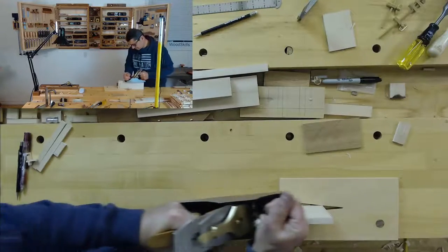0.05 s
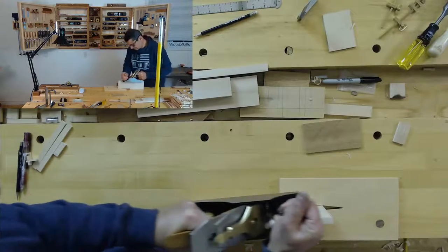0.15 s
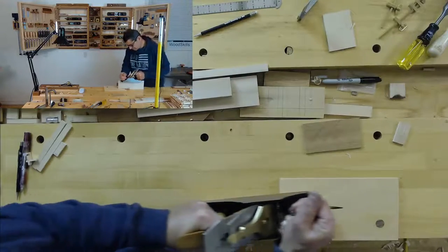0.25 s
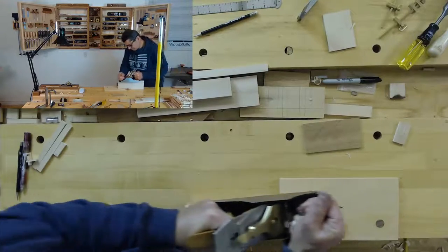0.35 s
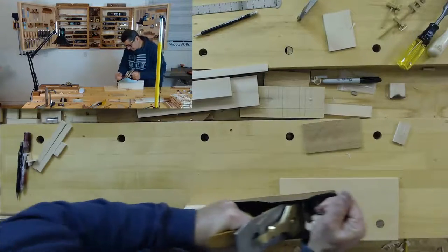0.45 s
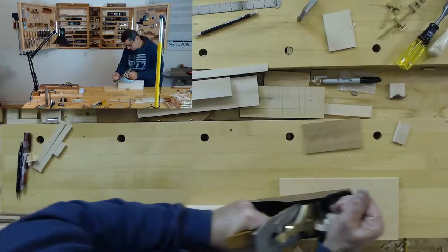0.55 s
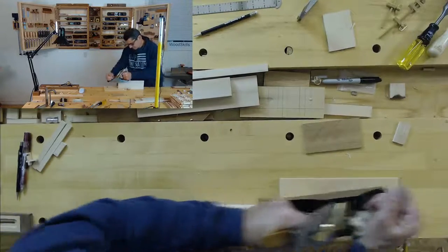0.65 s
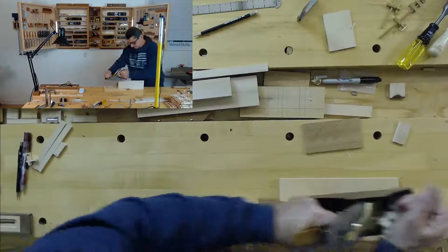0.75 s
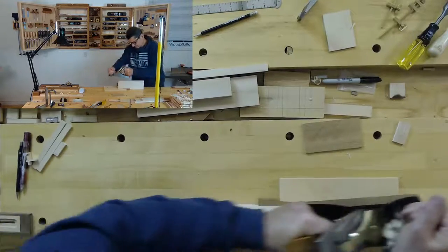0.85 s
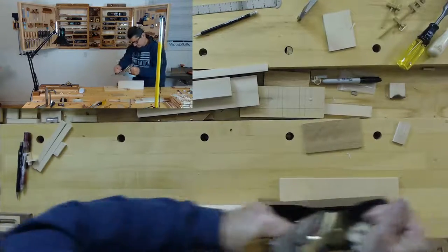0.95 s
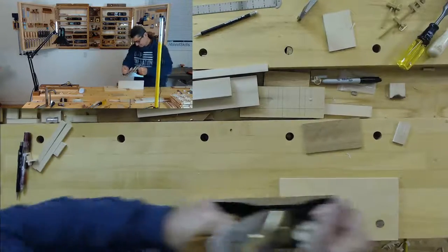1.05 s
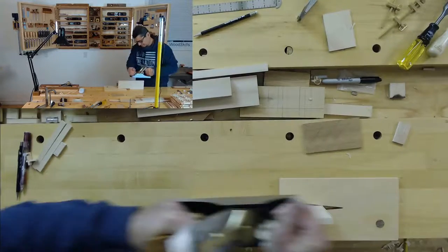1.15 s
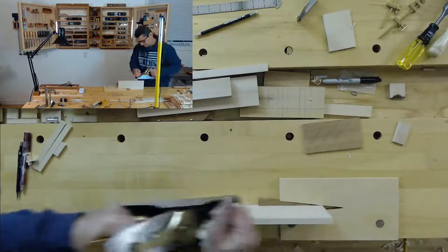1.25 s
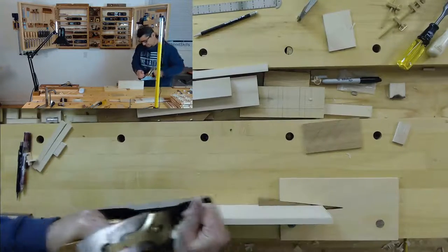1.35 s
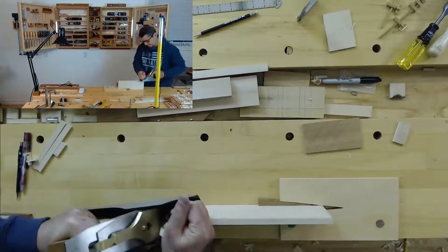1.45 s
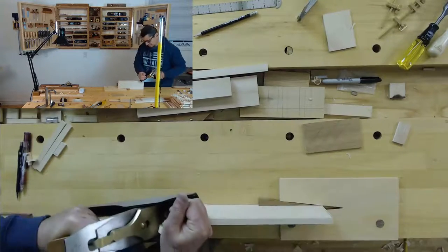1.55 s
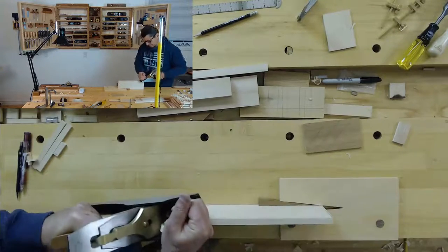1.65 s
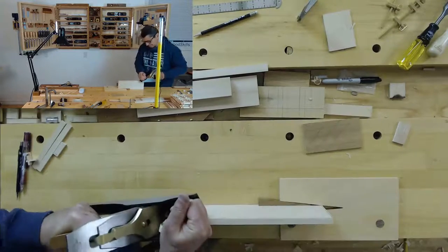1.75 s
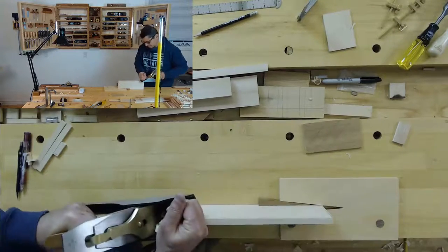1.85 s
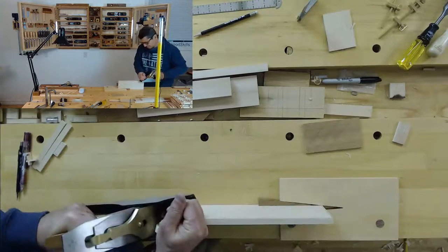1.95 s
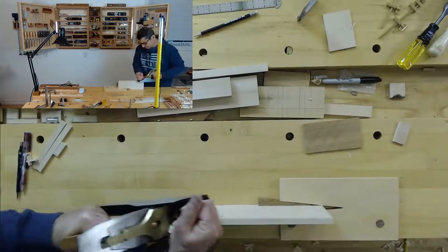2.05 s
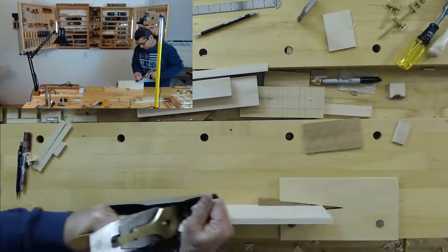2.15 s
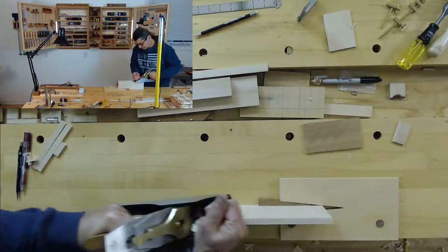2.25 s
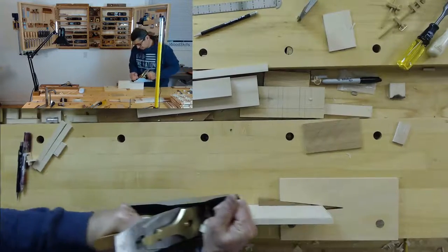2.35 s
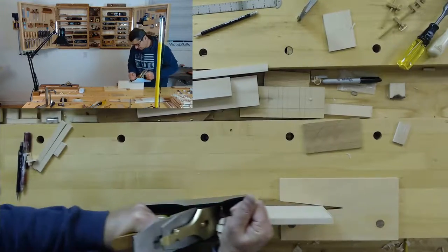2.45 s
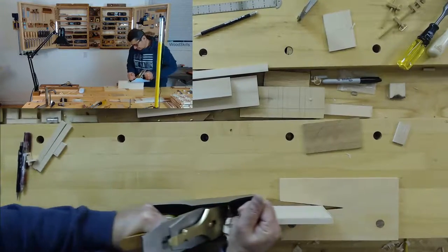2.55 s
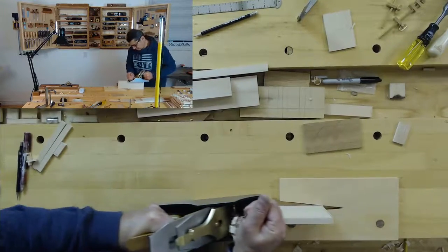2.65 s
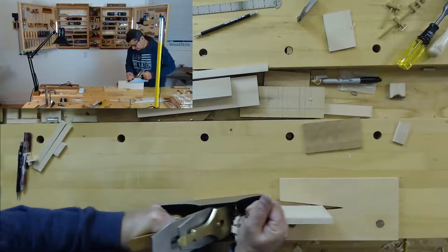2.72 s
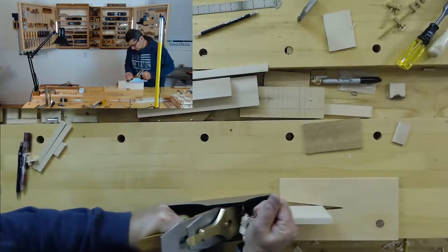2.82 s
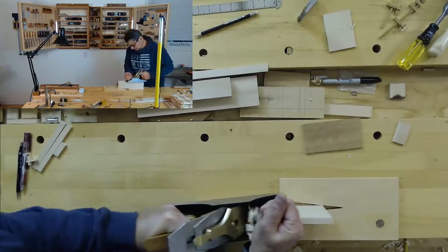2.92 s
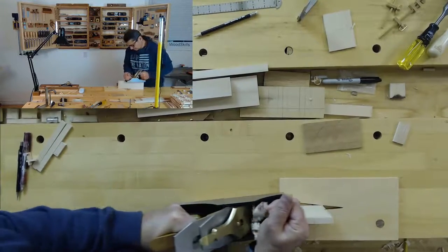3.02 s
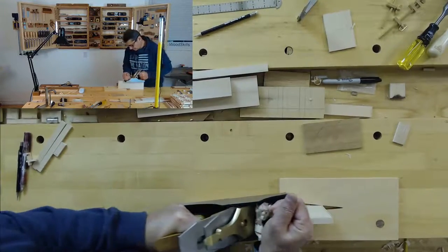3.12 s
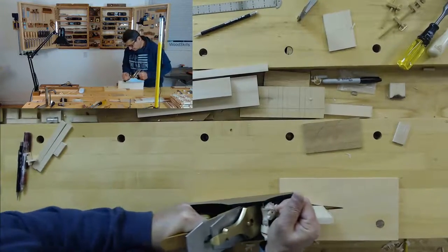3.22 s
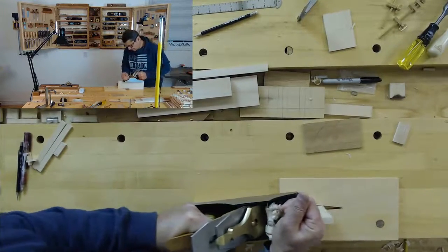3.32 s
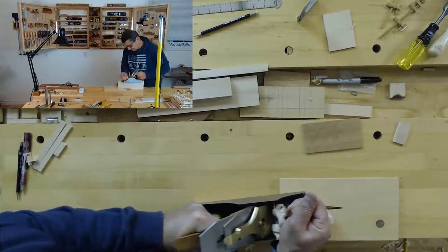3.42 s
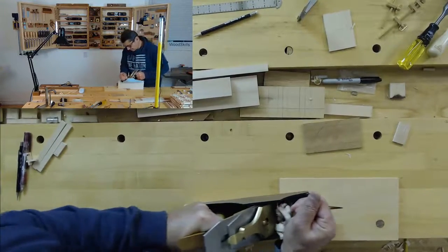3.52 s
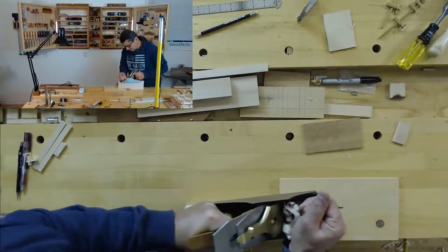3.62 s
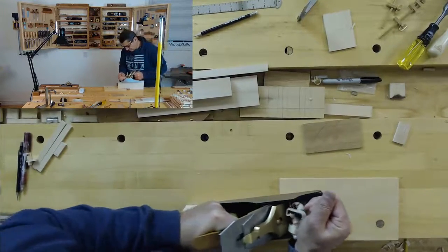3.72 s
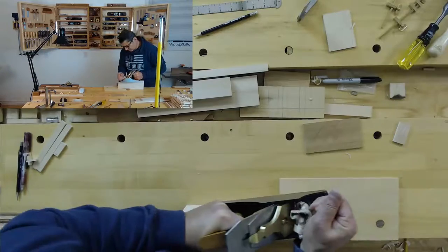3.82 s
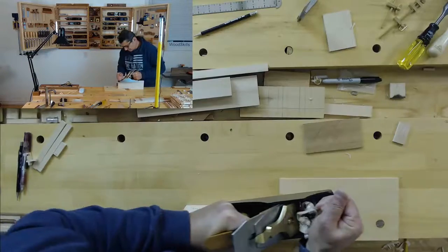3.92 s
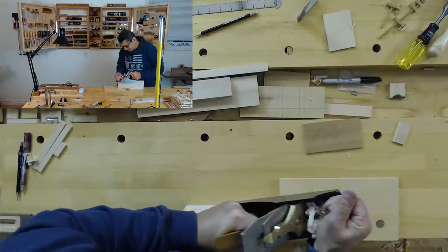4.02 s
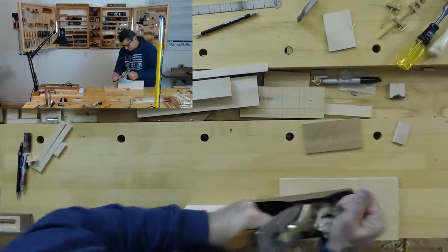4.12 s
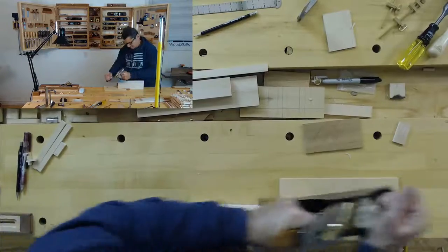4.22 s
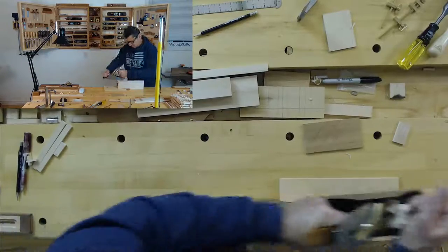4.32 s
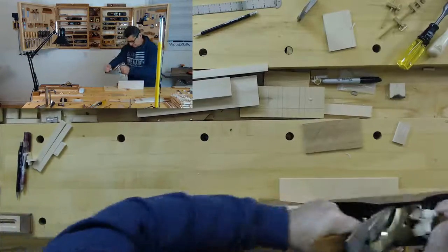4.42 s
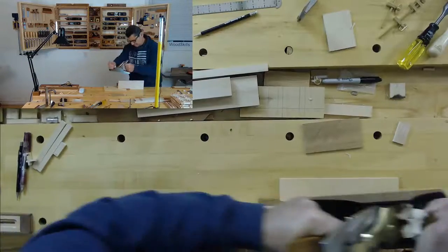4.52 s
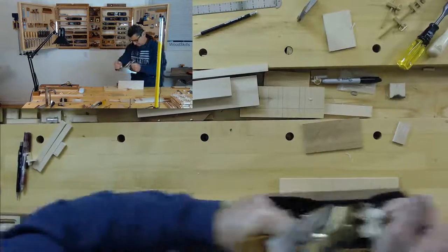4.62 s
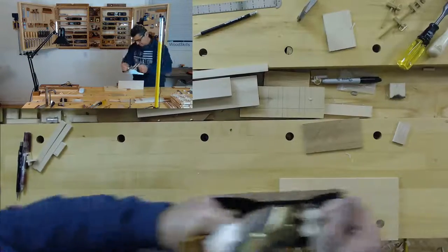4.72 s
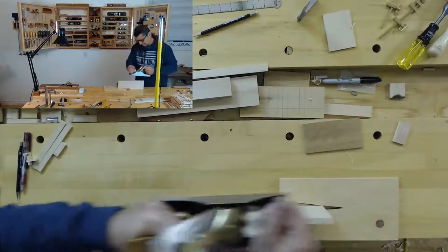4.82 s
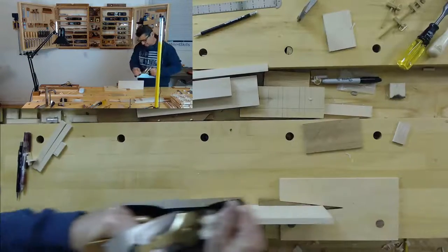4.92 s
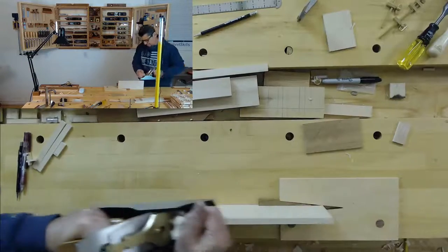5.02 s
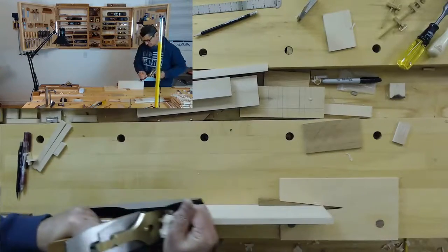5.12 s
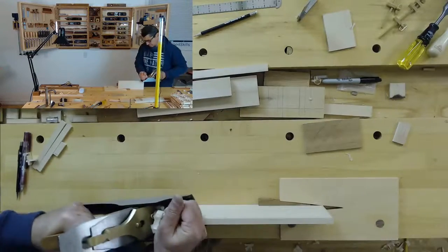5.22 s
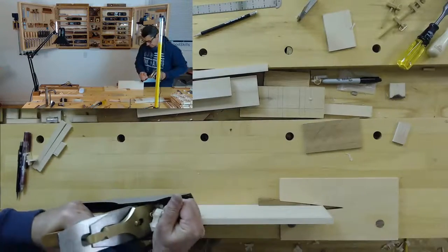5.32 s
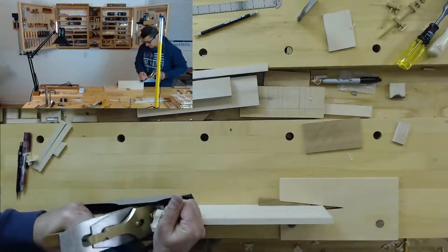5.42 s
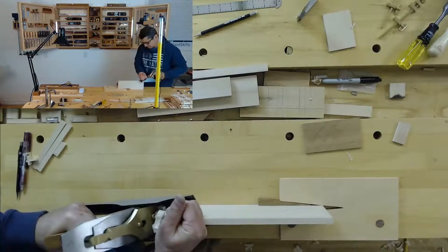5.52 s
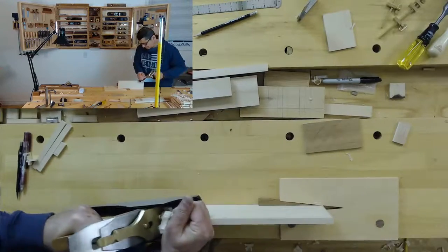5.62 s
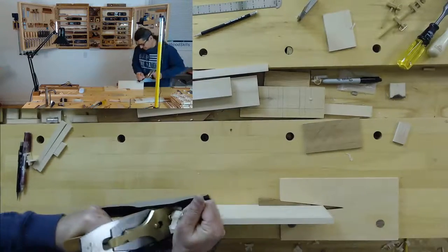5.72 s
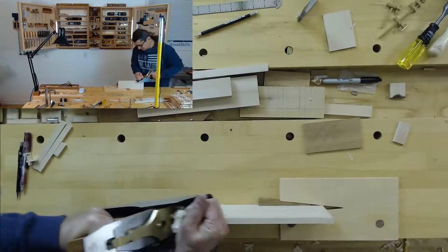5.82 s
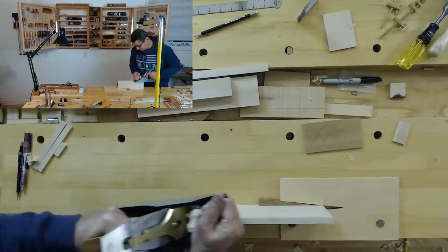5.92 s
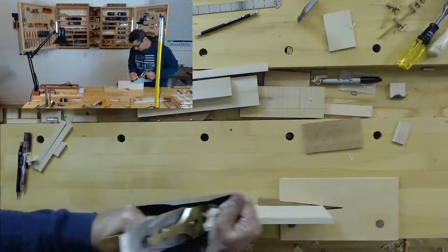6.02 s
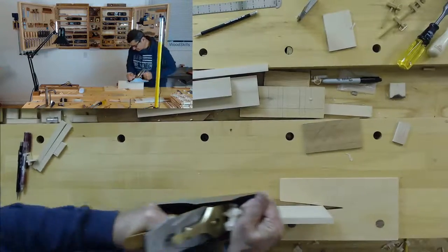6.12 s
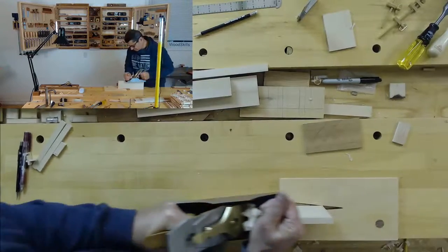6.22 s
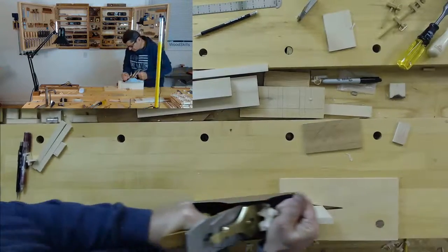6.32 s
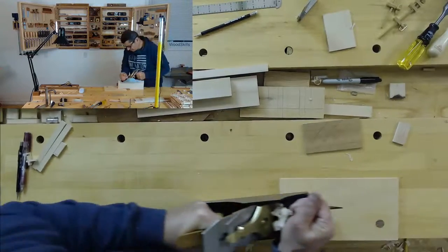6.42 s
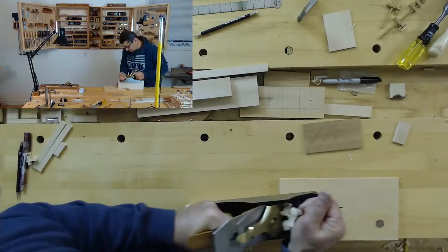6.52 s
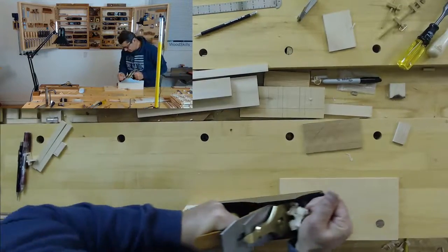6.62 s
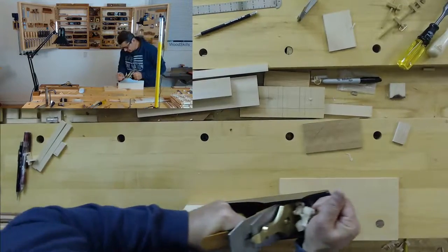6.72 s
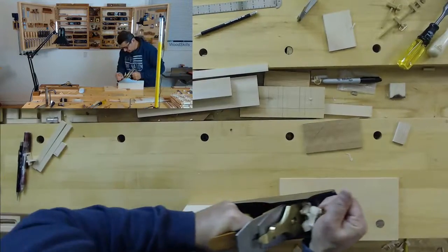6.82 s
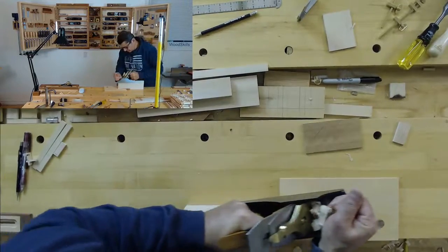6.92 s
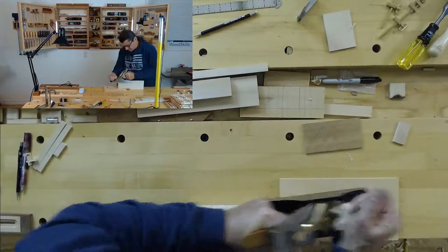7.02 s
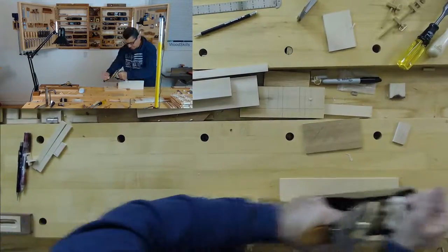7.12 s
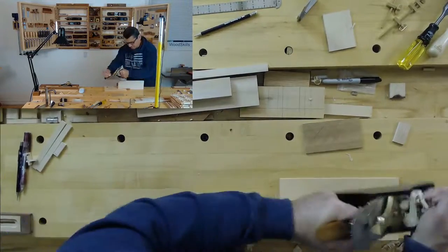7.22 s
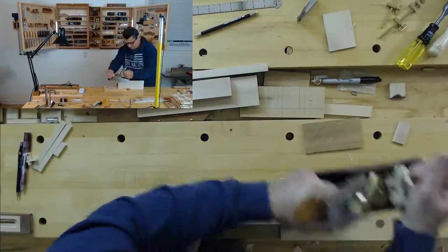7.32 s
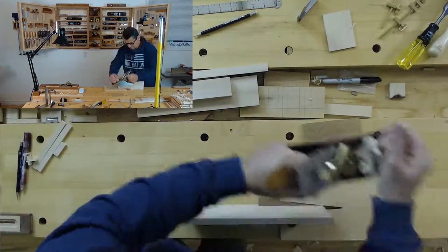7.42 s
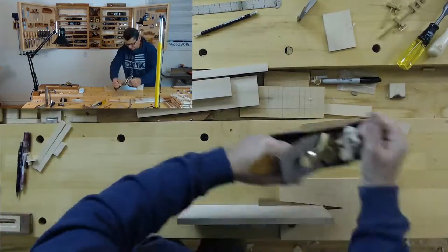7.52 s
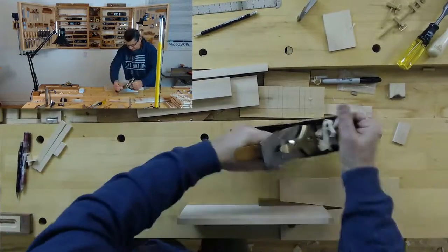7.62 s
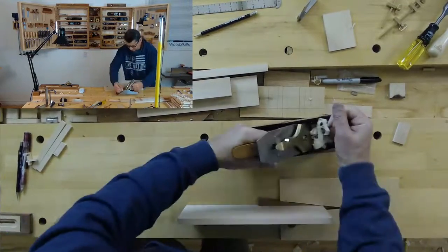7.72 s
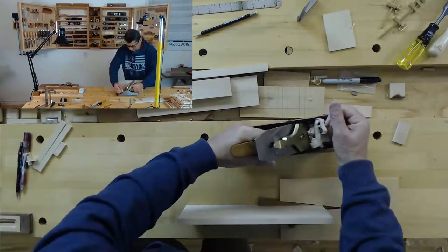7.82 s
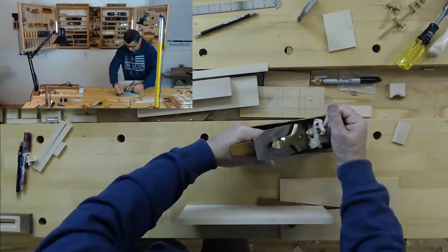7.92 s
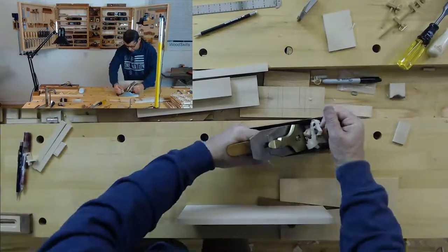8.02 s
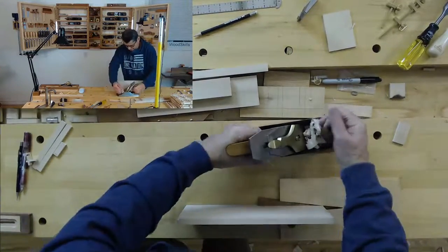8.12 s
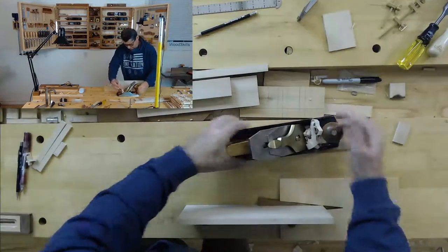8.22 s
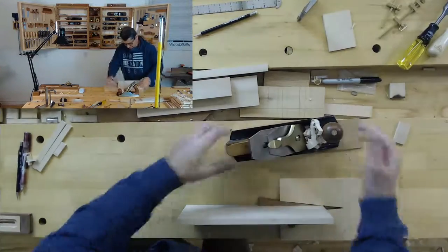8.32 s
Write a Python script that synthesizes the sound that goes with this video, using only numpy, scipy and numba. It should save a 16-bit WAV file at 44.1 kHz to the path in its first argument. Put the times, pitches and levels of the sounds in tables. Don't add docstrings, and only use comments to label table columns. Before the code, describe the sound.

Three rasping hand plane strokes tear along a wooden board, with a thin crackle of curling shavings and steely hiss. Hard knocks and low bench booms mark stroke ends and the plane being set back, with faint rubbing between. The last sound is a deep double thump as the tool is laid down. Close microphone, live hard room, soft air and low bench rumble.

```python
import sys
import numpy as np
from scipy import signal
from scipy.fft import rfft, irfft
from scipy.io import wavfile
from scipy.ndimage import uniform_filter1d
from numba import njit

SR = 44100
rng = np.random.default_rng(int(sys.argv[2]) if len(sys.argv) > 2 else 0)


def attenuation_scalar(level_db):
    decades = np.asarray(level_db, float) / 20
    return 10 ** decades


def wav_out(sig):
    wavfile.write(sys.argv[1], SR, np.round(np.clip(np.atleast_2d(sig).T, -1, 1) * 32767).astype(np.int16))


N = 368655

# (time [s], place along the board [0-1], depth of cut [dB], speed of the blade [dB])
STROKES = [
    [(0.0, 0.3, -45, -49), (.032, 0.38, -35, -46), (.23, 0.64, -33, -50.5), (.358, 0.63, -34.5, -48.5),
     (.466, 0.68, -33.5, -45.5), (.548, .9, -29.5, -39), (.6, 0.98, -29, -33), (.612, 0.93, -25, -53),
     (.64, 1.0, -33.5, -56)],
    [(2.031, 0.0, -35, -35), (2.06, 0.1, -41.5, -47.5), (2.36, 0.1, -35, -49.5), (2.66, 0.28, -39.5, -56),
     (3.2, 0.59, -41.5, -55), (3.55, 0.67, -38.5, -57), (3.75, 0.64, -47, -56.5), (4.0, 0.96, -41, -51.5),
     (4.06, 0.95, -38, -47), (4.15, 0.98, -34.5, -36), (4.18, 1.0, -23, -53)],
    [(5.665, 0.12, -35, -39), (5.71, 0, -44, -59), (5.74, 0.04, -60, -69), (5.79, 0, -46, -54),
     (5.83, 0.16, -38, -46), (5.88, 0.06, -33, -45), (6.017, 0.18, -35.5, -43), (6.3, 0.34, -39, -49),
     (6.533, 0.36, -41, -54.5), (6.655, 0.69, -39, -54), (6.77, 0.81, -44, -55.5), (6.86, 0.94, -43, -51),
     (6.94, .95, -34.5, -43.5), (7.025, 0.95, -32, -34.5), (7.11, 0.94, -77, -79)],
]
LEAN_DB = [
    0.5,
    0.5,
    -2,
]
# (frequency [Hz], width [Hz], level [dB])
BOARD_MODES = [(576, 140, 0), (729, 186, 3.5), (896, 290, -1.5), (1090, 53, -4.5), (1170, 136, -3),
               (1670, 120, -26), (2020, 380, -9.5), (2470, 280, -6)]
# (frequency [Hz], width [Hz], level [dB])
BENCH_MODES = [(137, 15, -6), (168, 32, 2.5), (192, 62, 3), (202, 17, -13.5), (298, 13, 6), (398, 37, -1),
               (455, 170, 5), (500, 101, 5.5)]
# (frequency [Hz], width [Hz], level [dB])
IRON_MODES = [(2550, 250, -21), (3560, 155, 16.5), (4040, 850, 14.5), (5100, 500, 10.5), (5480, 320, 14.5),
              (6820, 1440, 14), (7460, 220, 13), (7780, 63, 7.5), (7100, 40, 12), (8600, 430, -39)]
# (frequency [Hz], width [Hz], level [dB])
SHAVING_MODES = [(9900, 460, 11.5), (10800, 3100, 11.5), (12400, 970, 15), (13300, 1500, 0),
                 (14400, 1400, 13.5)]
# (time [s], sole's overhang [Hz], level over the board [dB],
# board's free length [Hz], level over the board [dB])
GRIP_RINGS = [
    [(0.0, 1534, 0, 920, -7), (.2, 1470, -5.5, 880, -13), (.3, 1330, 0.5, 1010, 0.5),
     (.38, 1260, 2.5, 1090, 2.5), (.46, 1130, -5, 825, 2), (.53, 1160, 3, 860, -17),
     (.64, 1130, -8, 710, 8)],
    [(2.02, 936, 7.5, 734, 7.5), (2.18, 940, -11, 753, -1.5), (2.28, 1170, 1, 780, -8),
     (2.47, 1190, -5, 896, -3.5), (2.64, 1380, -7.5, 870, -25), (3.3, 1420, -5.5, 896, -5),
     (3.55, 1390, -9, 866, -4.5), (3.78, 1104, 3, 880, -2), (3.92, 873, 5.5, 900, -8),
     (4.02, 604, 9.5, 1160, 4), (4.18, 700, -10, 1130, -11)],
    [(5.665, 750, -8, 900, 4.5), (5.8, 750, -4.5, 890, -14), (5.87, 1177, -0.5, 874, -11),
     (6.1, 1170, -1, 890, -8), (6.2, 1340, -5, 920, -18), (6.38, 1400, 1.5, 966, 2),
     (6.55, 1270, -3, 845, -21), (6.7, 1170, -10, 870, 3.5), (6.77, 800, 8, 955, -11),
     (6.85, 500, -2, 1300, 3), (6.95, 1060, 3, 1280, -2.5), (7.11, 1170, -10, 1220, -29)],
]
# (time [s], frequency [Hz], level over the board [dB])
CAP_IRON = [(0.0, 2010, -5), (.15, 1970, -7), (.3, 1970, -18), (.5, 2000, -4), (.64, 1860, -9),
            (2.02, 1930, -6.5), (2.3, 1920, -5.5), (2.5, 1920, -11.5), (2.9, 1970, -12), (3.35, 1940, -10),
            (3.6, 2150, -22), (3.75, 2160, -4.5), (3.95, 2120, -10), (4.07, 1940, -1), (4.18, 2050, -2.5),
            (5.665, 1950, -16), (5.87, 1925, -6), (6.0, 2110, -9), (6.15, 1960, -5), (6.35, 1970, 0.5),
            (6.55, 2020, -8), (6.8, 2200, -16), (6.93, 1970, -2.5), (7.03, 1980, -2), (7.11, 1960, -10)]
# (place [0-1], bench top [Hz], bench [dB], shaving over the iron [dB])
ALONG_BOARD = [(0.0, 161, -42, -8), (.1, 190, -41, -7), (.2, 232, -38.5, -15), (.35, 277, -38.5, -10),
               (.6, 298, -37.5, -8.5), (.75, 452, -34, -4), (.9, 483, -26, -5), (.95, 353, -30.5, -5),
               (1.0, 440, -23.5, -2)]
USUAL_CUT_DB, USUAL_SPEED_DB = -42.5, -54.5
BENCH_FOLLOWS_CUT, SHAVING_FOLLOWS_SPEED = 0.12, 0.72
GRAIN_SWING_DB = 1.16

# (time [s], rocking [dB], shudder [dB])
JOLTS = [(0.0, -41, -62), (.56, -39, -30), (.7, -37.5, -40), (0.918, -69, -38.5), (1.212, -102, -48.5),
         (1.7, -32.5, -39), (2.05, -33, -37), (2.18, -34.5, -47), (2.51, -36.5, -58), (3.1, -41, -54),
         (3.75, -43, -59), (4.15, -44.5, -60), (5.12, -53, -49.5), (5.38, -32.5, -43), (5.68, -32.5, -33),
         (5.91, -37, -36), (6.25, -38, -51), (6.89, -38, -43), (7.04, -32, -28.5), (8.009, -29.5, -21),
         (8.28, -38, -40)]
JOLT_RISE_DB_PER_S, ROCK_FALL_DB_PER_S, SHUDDER_FALL_DB_PER_S = 443, 25, 118
ROCK_REST_DB, SHUDDER_REST_DB = -50.5, -57.5

# (frequency [Hz], level per Hz [dB])
AIR_SPECTRUM = [(30, -25), (100, 2.5), (160, 4.5), (250, 3), (400, -1), (630, -8.5), (1000, -8.5),
                (2000, -14), (2600, -20), (5000, -24), (10000, -30), (15500, -30)]
AIR_DB = -54.5

# (time [s], peak [dB], frequency [Hz])
SNAPS = [(0.3082, -47, 12700), (1.6182, -65, 9650), (1.6467, -62, 11000), (2.0383, -48, 10100),
         (2.5411, -42, 13500), (2.5646, -48, 12400), (2.615, -39, 12900), (3.0654, -35, 14200),
         (3.2555, -47, 13500), (3.5227, -38, 12000), (3.562, -46, 14500), (3.7319, -39, 12400),
         (5.3253, -52, 9460), (5.676, -46, 10250), (5.822, -48, 9900), (6.9461, -39, 9900),
         (7.441, -73, 12100), (7.493, -43, 10100), (7.9274, -59, 9008), (7.9867, -52, 9370),
         (8.142, -47, 10500)]

SURGE = [
    [(.53, -23.5), (2.27, -32), (4.06, -27.5), (5.72, -35), (5.9, -41)],
    [(127.4, 0, 0.027, 0.51)],
]
RUN_OFF = [
    [(.6, -19.5), (4.16, -28)],
    [(139.7, 3.5, 0.021, 0.17), (431, 1.5, 0.011, 0.38)],
]
END_RING = [
    [(.605, -32), (4.16, -24)],
    [(732, -1, 0.0024, 0.54), (672, -3, .004, .35), (560, -6, .004, 0.27)],
]
SET_ON_BOARD = [
    [(1.62, -18)],
    [(136, -2, 0.0029, 0.39), (156, -4.5, 0.0054, 0.45), (227, -16, 0.0055, 0.78), (287.4, -12.5, 0.0035, 0.53), (404, -11, 0.01, 0.3), (473, -14.5, 0.0081, 0.89)],
]
SOLE_RING = [
    [(1.62, -31.5), (5.04, -48), (5.326, -35)],
    [(1453, 0, .0015, 0.13), (1227, -8, .002, 0.3), (1390, -3, .03, 0.98), (1450, -8.5, .04, 0.94), (1580, -6.5, .002, 0.21), (1125, -10, .02, .6)],
]
BITE = [
    [(2.045, -27), (5.68, -28)],
    [(72.4, 0, 0.0043, 0.11)],
]
SET_AGAIN = [
    [(5.326, -18)],
    [(126, -1.5, 0.004, 0.44), (158.8, -5.5, 0.0065, 0.47), (226, -14.5, 0.0055, 0.7), (295, -15.5, 0.0046, 0.89), (467, -11.5, 0.0075, 0.91), (524, -7.5, 0.008, 0.71)],
]
LIFT_OFF = [
    [(7.022, -24)],
    [(125.6, 0, 0.0064, 0.4), (184, -1, 0.0034, 0.42), (274.6, 3.5, 0.0021, 0.26)],
]
LAID_DOWN = [
    [(7.929, -6)],
    [(208.3, 1.5, 0.034, 0.35), (174.4, -9, .012, 0.21), (243, -16.5, .01, 0.26), (351, -10.5, 0.017, 0.29), (128, -8.5, 0.0029, 0.1)],
]
HEEL_DOWN = [
    [(7.988, -13.5)],
    [(206, -0.5, 0.0049, 0.4), (226, -13, .005, .45), (277.7, -11, .005, 0.6), (457, -9, .008, 0.62), (539, -10, 0.004, .3), (627, -10, .003, 0.19), (773, -15, .004, 0.56), (883, -19.5, .002, 0.58)],
]

# (time [s], middle wood and thud [dB], deep wood [dB], hard wood and rattle [dB], crack
# [dB])
KNOCKS = [(0.607, -17.5, -24, -28, -40), (1.25, -61, -70, -69, -65), (1.519, -46, -58, -56, -72),
          (1.62, -16.5, -24.5, -37, -50), (2.043, -42, -39.5, -54, -57), (3.137, -38, -65, -44, -59),
          (4.16, -14, -26.5, -29, -39), (5.04, -31, -54, -44, -50.5), (5.144, -41, -56, -54, -61),
          (5.209, -44, -56, -47, -58), (5.265, -42, -57, -49, -61), (5.326, -15, -24.5, -28.5, -43.5),
          (5.677, -52, -38.5, -37.5, -46.5), (7.023, -54, -42, -34, -48), (7.118, -26.5, -35.5, -51, -61),
          (7.466, -64, -79, -57, -59), (7.493, -52, -73, -56, -57), (7.929, -28.5, -29, -38, -40.5),
          (7.988, -17.5, -17.5, -25, -47)]
# (frequency [Hz], level [dB], t60 [s])
WOOD_MODES = [(257, -2, 0.018), (288, -3, 0.052), (308, -8.5, 0.04), (410, -3, 0.036), (437.4, -6.5, 0.11),
              (510, -10.5, 0.32), (517.6, -6, 0.063), (569, 4, 0.019), (648, -3, 0.056), (766, -4, 0.054),
              (800, -9, 0.03), (974, 5.5, 0.024), (1018, -13, 0.071), (1130, -24, 0.007), (1160, 9, 0.016),
              (1400, 11, 0.008), (1390, 8.5, 0.011), (1746, 2.5, 0.041), (1970, 4, 0.0072),
              (2165, -6, 0.0067), (2210, -26, 0.011), (2310, 2.5, 0.012), (2630, 5, 0.0074),
              (2900, -11, 0.0022)]
CONTACT_MS = 7
RATTLE_DB, RATTLE_T60_S = 16, 0.076
THUD_DB, THUD_T60_S = 0.5, 0.084

# (time [s], duration [s], first level [dB], last level [dB])
RUBS = [(1.265, 0.042, -72, -80), (1.526, 0.073, -50, -82), (1.634, 0.073, -39.5, -46),
        (1.73, .15, -60, -76), (1.92, 0.16, -61, -39), (5.04, 0.15, -58, -60), (5.205, 0.13, -51.5, -59),
        (5.382, 0.34, -60.5, -46), (7.15, 0.15, -49, -81), (7.297, 0.13, -67, -65), (7.492, 0.12, -74, -91),
        (8.04, 0.38, -52, -66)]
# (time [s], level [dB], frequency [Hz], t60 [s])
PINGS = [(7.494, -54, 3230, .04), (7.497, -58, 2100, .04), (7.52, -59, 3180, .05), (7.552, -61, 3120, .05),
         (7.585, -60, 3230, .05), (7.66, -64, 3150, .05), (7.9276, -21, 3800, .008),
         (7.9292, -21, 4150, .009), (7.9282, -28, 5300, .008), (7.934, -33, 2800, .025),
         (7.94, -37, 3150, .03), (7.949, -38, 2620, .025), (7.96, -38, 2900, .03), (7.972, -40, 2750, .03),
         (7.9875, -24, 2380, .012), (1.625, -50, 7000, .012), (2.041, -50, 6800, .02),
         (7.929, -38, 7900, .01)]

# (frequency [Hz], t60 [s])
ROOM_T60 = [(60, 1), (250, 0.8), (1000, 0.99), (3000, 0.84), (7000, 0.68), (14000, 0.39)]
# (frequency [Hz], level [dB])
ROOM_COLOUR = [(20, -15), (60, -3.5), (250, 2), (1000, 0.5), (3000, 0.3), (7000, -0.1), (14000, -1.5),
               (20000, -3.5)]
DIRECT_DB, ROOM_DB, ROOM_BUILD_S = -3.5, -5, 0.0039


def rms_one(x):
    return x / np.sqrt(np.mean(x ** 2) + 1e-20)


def at_hz(points, hz):
    points_hz, value = np.transpose(points)
    return np.interp(np.log(hz), np.log(points_hz), value)


def follow(x, table):
    first, *columns = np.transpose(table)
    return [np.interp(x, first, column) for column in columns]


def band(x, low_hz, high_hz):
    edges = [low_hz, min(high_hz, .45 * SR)]
    return signal.sosfilt(signal.butter(2, edges, "band", fs=SR, output="sos"), x)


def dull(x, top_hz):
    return signal.sosfilt(signal.butter(3, top_hz, fs=SR, output="sos"), x)


def drift(rate_hz):
    r = np.exp(-80 * np.pi * rate_hz / SR)
    slow = signal.lfilter([1], [1, -2 * r, r * r], rng.standard_normal(N // 40 + 2002))[2000:]
    return np.interp(np.arange(N) / 40, np.arange(len(slow)), rms_one(slow - slow.mean()))


def ring(clicks, hz, t60):
    r = attenuation_scalar(-60 / (t60 * SR))
    w = 2 * np.pi * hz / SR
    return signal.lfilter([0, np.sin(w)], [1, -2 * r * np.cos(w), r * r], clicks + 1e-18)


def tearing(per_s, spread_db):
    hardness = np.minimum(rng.exponential(1, (2, N)), 5)
    sizes = attenuation_scalar(spread_db * hardness) * rng.choice([-1, 1], (2, N))
    return rms_one(sizes * (rng.random((2, N)) < per_s / SR))


def body(force, modes, patchy_db, rate_hz):
    out = np.zeros(N)
    for k, (hz, width_hz, level_db) in enumerate(modes):
        r = np.exp(-np.pi * width_hz / SR)
        poles = [1, -2 * r * np.cos(2 * np.pi * hz / SR), r * r]
        peak = signal.lfilter([1 - r, 0, r - 1], poles, force[k % 2])
        out += peak * attenuation_scalar(level_db + patchy_db * drift(rate_hz))
    return rms_one(out)


@njit
def gliding(force, hz, width_hz):
    r = np.exp(-np.pi * width_hz / SR)
    out = np.zeros(len(force))
    for i in range(2, len(force)):
        turn = 2 * r * np.cos(2 * np.pi * hz[i] / SR)
        out[i] = force[i] - force[i - 2] + turn * out[i - 1] - r * r * out[i - 2]
    return out


def board_voice(force, t):
    over_hz, over_db, free_hz, free_db = follow(t, np.concatenate(GRIP_RINGS))
    cap_hz, cap_db = follow(t, CAP_IRON)
    board = rms_one(dull(body(force, BOARD_MODES, patchy_db=2.5, rate_hz=6), 1800))
    free = rms_one(dull(rms_one(gliding(force[0], free_hz, 72.0)), 1800))
    overhang = rms_one(dull(gliding(force[1], over_hz, 72.0), 1510))
    cap = rms_one(band(gliding(force[1], cap_hz, 85.0), 1490, 2940))
    return board + attenuation_scalar(free_db) * free + attenuation_scalar(over_db) * overhang + attenuation_scalar(cap_db) * cap


def bench_voice(force, top_hz):
    top = rms_one(band(gliding(force[1], top_hz, 50.0), 100, 1400))
    modes = body(force, BENCH_MODES, patchy_db=4.5, rate_hz=8.4)
    return rms_one(dull(modes + attenuation_scalar(-5.5) * top, 624))


def iron_voice(force):
    return rms_one(band(body(force, IRON_MODES, patchy_db=1.5, rate_hz=2.0), 2300, 9500))


def shaving_voice():
    curl = tearing(5000, spread_db=4.0) * attenuation_scalar(0.85 * drift(25))
    return rms_one(band(body(curl, SHAVING_MODES, patchy_db=2.2, rate_hz=12), 8800, 17000))


def planing():
    t = np.arange(N) / SR
    strokes = np.concatenate(STROKES)
    place, board_db, iron_db = follow(t, strokes)
    top_hz, bench_db, shaving_db = follow(place, ALONG_BOARD)
    lean_db = np.interp(t, strokes[:, 0], np.repeat(LEAN_DB, [len(rows) for rows in STROKES]))
    bench_db = bench_db + BENCH_FOLLOWS_CUT * (board_db - USUAL_CUT_DB) + lean_db
    shaving_db = shaving_db + USUAL_SPEED_DB + SHAVING_FOLLOWS_SPEED * (iron_db - USUAL_SPEED_DB)
    cutting = np.zeros(N)
    for rows in STROKES:
        start = rows[0][0]
        if start > 0:
            start += .012
        cutting += (t >= start) & (t < rows[-1][0])
    cutting = uniform_filter1d(cutting, size=500)
    force = tearing(12000, spread_db=2.5) * attenuation_scalar(1.6 * drift(25))
    grain_db = GRAIN_SWING_DB * drift(15.0)
    wood = attenuation_scalar(board_db) * board_voice(force, t) + attenuation_scalar(bench_db) * bench_voice(force, top_hz)
    metal = attenuation_scalar(iron_db + grain_db) * iron_voice(force)
    shaving = attenuation_scalar(shaving_db + 0.72 * grain_db) * shaving_voice()
    return cutting * (wood + metal + shaving)


def sway():
    t = np.arange(0, N + 64, 64) / SR
    push = rng.standard_normal((2, N + SR))
    s, rock_db, shudder_db = np.transpose(JOLTS)[:, :, None]
    early_db = np.maximum(s - t, 0) * JOLT_RISE_DB_PER_S
    late = np.maximum(t - s, 0)
    rock_db = (rock_db - early_db - late * ROCK_FALL_DB_PER_S).max(axis=0)
    shudder_db = (shudder_db - early_db - late * SHUDDER_FALL_DB_PER_S).max(axis=0)
    rocking = attenuation_scalar(np.maximum(rock_db, ROCK_REST_DB))
    shaking = attenuation_scalar(np.maximum(shudder_db, SHUDDER_REST_DB))
    rock = rms_one(ring(push[0], 26.0, 0.49)[SR:]) + 3.6 * rms_one(ring(push[1], 35.4, 0.29)[SR:])
    rock = 1.8 * rms_one(rock / uniform_filter1d(rock ** 2, size=3000) ** .3)
    shudder = rms_one(band(ring(push[1], 59.1, 0.35), 37, 142)[SR:])
    now = np.arange(N) / SR
    return attenuation_scalar(-4.0) * np.interp(now, t, rocking) * rock + np.interp(now, t, shaking) * shudder


def hush():
    hz = np.clip(np.arange(N // 2 + 1) * SR / N, 30, None)
    spectrum = rfft(rng.standard_normal(N)) * attenuation_scalar(at_hz(AIR_SPECTRUM, hz))
    return attenuation_scalar(AIR_DB) * rms_one(irfft(spectrum, N))


def snaps():
    out, size = np.zeros(N + SR), 600
    decay = attenuation_scalar(-60 * np.arange(size) / SR / 0.0069)
    for s, peak_db, hz in SNAPS:
        tick = band(rng.standard_normal(size) * decay, hz - 3000, hz + 3000)
        start = round(s * SR)
        out[start:start + size] += attenuation_scalar(peak_db + 5.0) * tick
    return out[:N]


def rings(rows):
    out, t = np.zeros(N + SR), np.arange(SR) / SR
    for s, db, hz, rise, t60 in rows:
        start = round(s * SR)
        swell = (1 - np.exp(-t / rise)) * attenuation_scalar(db - 60 * t / t60)
        out[start:start + SR] += np.sin(2 * np.pi * hz * t) * swell
    return out[:N]


def booms():
    thumps = []
    for blows, modes in (SURGE, RUN_OFF, END_RING, SET_ON_BOARD, SOLE_RING, BITE, SET_AGAIN,
                         LIFT_OFF, LAID_DOWN, HEEL_DOWN):
        for s, db in blows:
            thumps += [(s, db + mode_db, hz, rise, t60) for hz, mode_db, rise, t60 in modes]
    return rings(thumps) * attenuation_scalar(1.5 * drift(20))


def struck_wood(mid_db, deep_db, hard_db, size):
    wood = np.zeros(size)
    colour = [(500, deep_db + 6.5), (1150, mid_db - 8.0), (2200, hard_db)]
    for hz, db, t60 in WOOD_MODES:
        late, sign, strength = rng.random(3)
        click = (np.arange(size) == int(late ** 2 * CONTACT_MS * SR / 1000)) * np.sign(sign - .5)
        click = click + 0.33 * np.roll(click, int((strength + late) * .012 * SR))
        mode_hz = hz * (1 + 0.063 * (sign * 2 % 1 - .5))
        wood += attenuation_scalar(at_hz(colour, hz) + db + 4.6 * strength) * ring(click, mode_hz, t60)
    return dull(wood, 4400)


def knocks():
    out, size = np.zeros(N + SR), SR // 4
    t = np.arange(size) / SR
    for s, mid_db, deep_db, hard_db, crack_db in KNOCKS:
        noise = rng.standard_normal(size)
        wood = struck_wood(mid_db, deep_db, hard_db, size)
        thud = band(np.roll(noise, size // 2) * attenuation_scalar(-60 * t / THUD_T60_S), 420, 1750)
        rattle = dull(band(noise[::-1] * attenuation_scalar(-60 * t / RATTLE_T60_S), 1420, 2520), 6500)
        crack = dull(band(noise * attenuation_scalar(-60 * t / .022), 3000, 8200), 8500)
        blow = wood + attenuation_scalar(mid_db + THUD_DB) * thud
        blow += attenuation_scalar(hard_db + RATTLE_DB) * rattle + attenuation_scalar(crack_db + 16.5) * crack
        start = round(s * SR)
        out[start:start + size] += blow
    return out[:N]


def rub():
    t, level = np.arange(N) / SR, np.zeros(N)
    for s, lasts, first_db, last_db in RUBS:
        level += attenuation_scalar(np.interp(t, [s, s + lasts], [first_db, last_db], left=-150, right=-150))
    grit = tearing(3000, spread_db=-7.0)[0] * attenuation_scalar(2.5 * drift(12))
    hiss = rms_one(band(grit, 1300, 5500))
    hiss += attenuation_scalar(-1) * rms_one(band(grit, 900, 1900))
    hiss += attenuation_scalar(-10.5) * rms_one(band(grit, 5500, 10500))
    return attenuation_scalar(-4.5) * level * hiss


def metal_pings():
    return rings([(s, db, hz, .0003, t60) for s, db, hz, t60 in PINGS])


def workshop(x):
    hz, when, grains = signal.stft(rng.standard_normal(SR), fs=SR, nperseg=1024, noverlap=768)
    grains = grains / np.sqrt(uniform_filter1d(abs(grains) ** 2, size=7, axis=1))
    hz = np.maximum(hz, 20)[:, None]
    decay = attenuation_scalar(at_hz(ROOM_COLOUR, hz) - 60 * when / at_hz(ROOM_T60, hz))
    tail = signal.istft(grains * decay, fs=SR, nperseg=1024, noverlap=768)[1][:SR]
    tail = tail * (1 - np.exp(-np.arange(SR) / SR / ROOM_BUILD_S))
    tail = tail / np.sqrt(np.sum(tail ** 2))
    before = x[SR // 4:0:-1]
    wet = signal.fftconvolve(np.r_[before, x], tail)[len(before):len(before) + N]
    return attenuation_scalar(DIRECT_DB) * x + attenuation_scalar(ROOM_DB) * wet


def scene():
    boom, ping = booms(), metal_pings()
    air = planing() + snaps() + knocks() + rub() + attenuation_scalar(-12) * boom + attenuation_scalar(-4) * ping
    return (workshop(air) + boom + ping + sway() + hush())[None]


def roll_off(x):
    return signal.sosfilt(signal.butter(12, 15700, fs=SR, output="sos"), x)


def record(dry):
    top_cut = signal.cheby2(14, 60, 16200, fs=SR, output="sos")
    mix = signal.sosfilt(top_cut, dry)
    return roll_off(mix)


dry = scene()
out = record(dry)
wav_out(out)
```